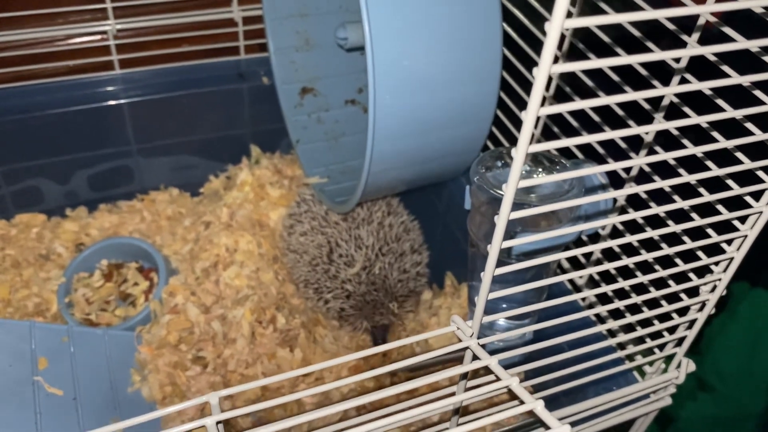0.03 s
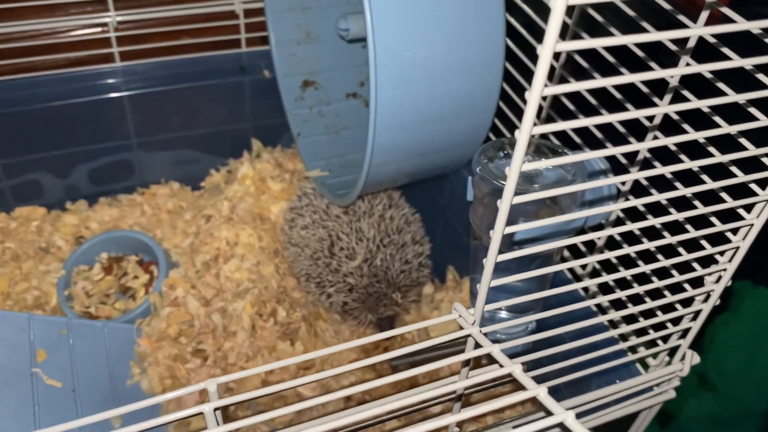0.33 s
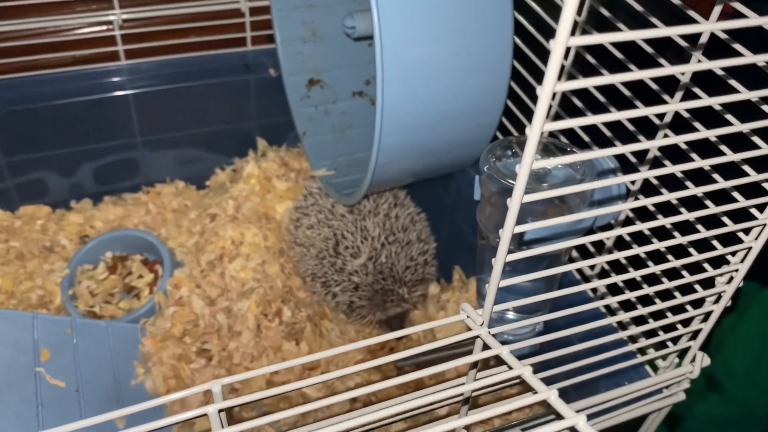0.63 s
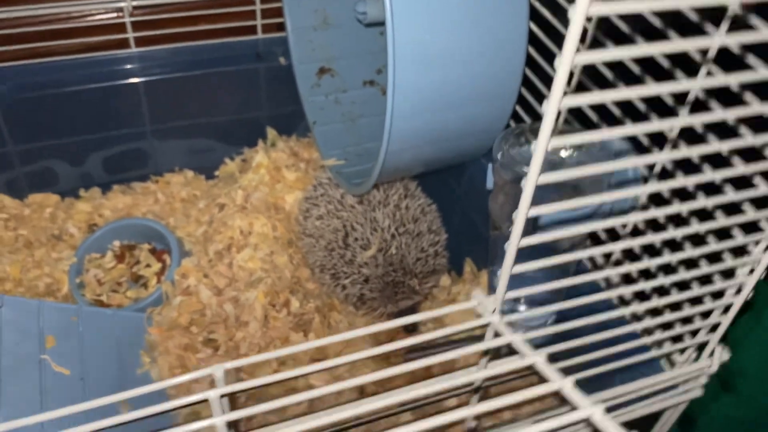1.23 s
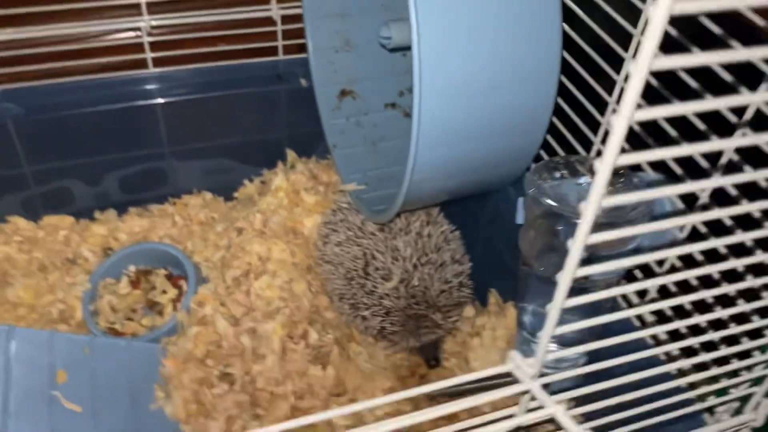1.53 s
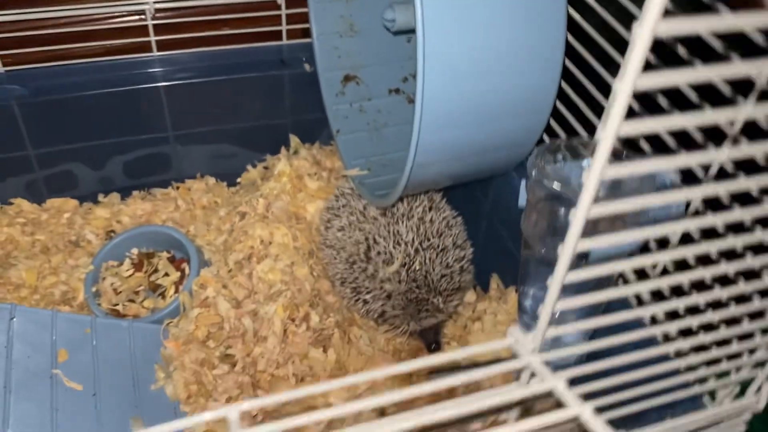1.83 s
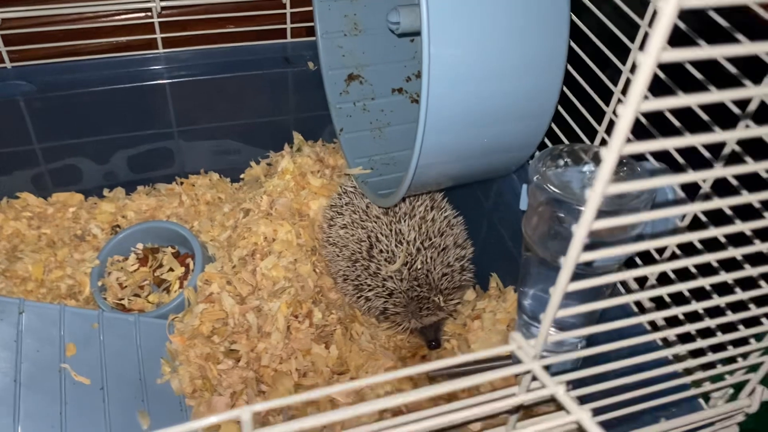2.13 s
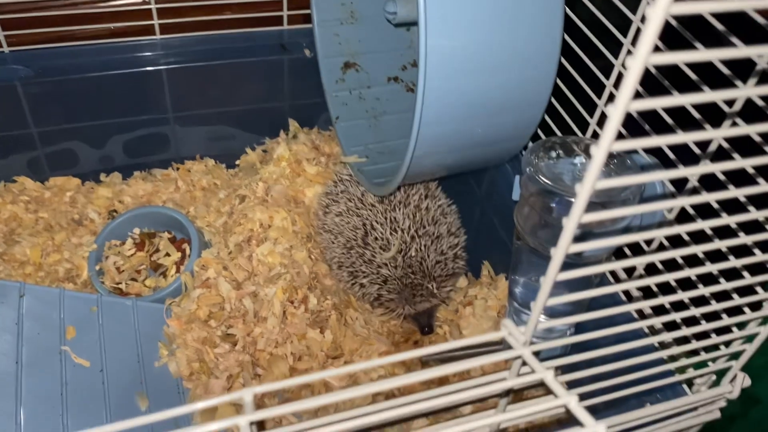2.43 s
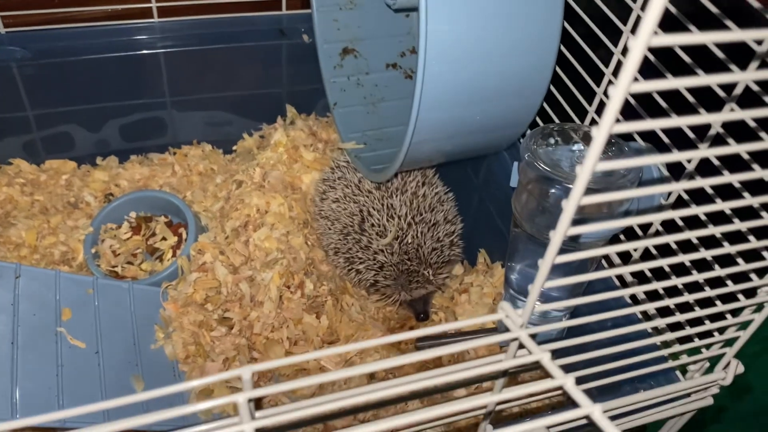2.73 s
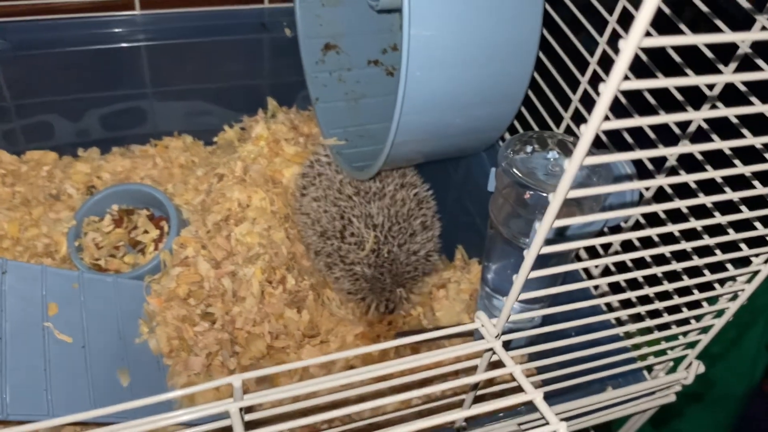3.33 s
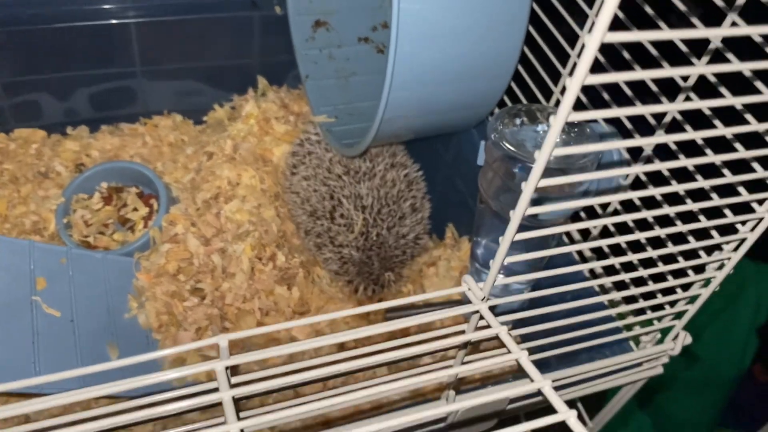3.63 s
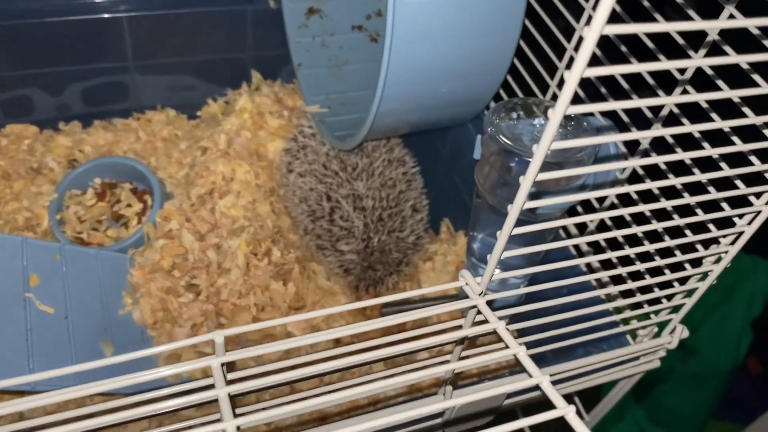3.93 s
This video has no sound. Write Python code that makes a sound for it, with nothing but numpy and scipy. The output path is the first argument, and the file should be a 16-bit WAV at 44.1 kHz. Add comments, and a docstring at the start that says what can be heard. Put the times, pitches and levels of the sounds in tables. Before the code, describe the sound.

Wood shavings rustle and snap as a hedgehog sniffs faintly and digs close to the microphone, softly bumping its plastic tub. Near the end, one loud knock sets the wire cage rattling. A small room hums low underneath.

```python
"""Quick little sniffs sound over the mains hum and low rumble of a small room. A hedgehog, close to the
microphone, is puffing air through its nose and digging in wood shavings in a wire cage with a plastic tub.
The chips rustle and snap, its spines scrape the wall, and the tub is bumped softly.
Near the end, one loud knock sets the tub booming and the wires ringing and rattling."""
import sys
import numpy as np
from scipy import signal
from scipy.fft import rfft, irfft, next_fast_len
from scipy.io import wavfile
from scipy.ndimage import uniform_filter1d

SR = 44100
rng = np.random.default_rng(int(sys.argv[2]) if len(sys.argv) > 2 else 0)


def wrap_up_sound(samples):
    """Save the sound to the file named by the first command line argument, as 16-bit audio."""
    columns = np.atleast_2d(samples).T
    # keep every value between -1 and 1, then stretch to whole-number steps
    tamed = np.clip(columns, -1, 1)
    steps = np.round(tamed * 32767).astype(np.int16)
    wavfile.write(sys.argv[1], SR, steps)


N = 176400
T = np.arange(N) / SR

# Echo of cage and room; a fade time is how long a sound takes to drop 60 dB (frequency [Hz], fade time [s])
ROOM_FADE = [(500, 0.27), (2000, 0.2), (14000, 0.075)]
# How alike the two microphones hear sound that comes from all sides (frequency [Hz], likeness [0-1])
MIC_LIKENESS = [(60, .95), (300, 0.45), (600, 0.11), (2500, 0.046), (6500, 0.19), (8500, 1)]
# How far the left microphone runs ahead of the right (frequency [Hz], phase lead [radians])
MIC_LEAD = [(900, 0), (2200, 1.1), (3000, -.7), (6500, .3), (7500, 1.6), (9250, 3.14), (11500, 5.6),
            (13300, 6.7), (15500, 9.4)]

# Tones of the mains hum (frequency [Hz], level [dB])
HUM_TONES = [(60, -71), (120, -61), (180, -55.5), (300.4, -59), (360, -77)]
# Rumble and hiss of the room (frequency [Hz], relative level [dB])
RUMBLE_SPECTRUM = [(20, -25), (55, 1.5), (88, 4.5), (200, -8.5), (320, -20), (1200, -34), (3000, -36.5),
                   (6000, -43.5), (15000, -52)]

# How loudly the shavings are stirred (time [s], level [dB])
STIR_LEVELS = [(0, -81.5), (.6, -78.5), (.7, -67.5), (.88, -63), (1.18, -64), (1.56, -66), (2.1, -67.5),
               (2.5, -73.5), (2.88, -66.5), (2.99, -56.5), (3.24, -54.5), (3.35, -60), (3.72, -64)]
# Tone colour of stirred shavings (frequency [Hz], relative level [dB])
STIR_SPECTRUM = [(150, 6), (450, 5.5), (1000, -0.5), (2400, -0.5), (3300, -4.5), (4200, -3.5), (6000, -7),
                 (9000, -13), (15000, -13)]
# Spines scraping the tub wall (time [s], resonance [Hz], level [dB])
SCRAPE_PATH = [(2.94, 4100, -74), (3.02, 4160, -57), (3.33, 4080, -62.5), (3.38, 3590, -68),
               (3.75, 3770, -75)]
# How loudly the shavings slide after the knock (time [s], level [dB])
SLIDE_LEVELS = [(3.82, -56), (3.86, -48), (3.9, -53.5), (3.92, -67), (4, -62.5)]
# Hiss of sliding shavings (frequency [Hz], relative level [dB])
SLIDE_SPECTRUM = [(1500, -9), (4000, 4), (7000, 0.5), (14500, -4)]
# Shoves through the shavings (start [s], length [s], level [dB])
SHOVES = [(0.112, 0.056, -65), (.635, 0.038, -59), (.885, .16, -55), (1.047, .11, -53),
          (1.626, 0.062, -58.5), (1.752, 0.074, -51), (2.428, 0.058, -66.5), (3.155, 0.047, -50.5)]
# Swish of a shove (frequency [Hz], relative level [dB])
SWISH_SPECTRUM = [(500, 4), (2400, -0.5), (3500, -4), (15000, -19)]
# Chips breaking (time [s], level [dB], woody body relative to the tick [dB], top treble gain [dB])
CHIP_SNAPS = [(.225, -63.5, 14, -12), (.646, -52, 2.5, -11), (1.232, -26, -10, -3),
              (1.3565, -40.5, -14, -7), (1.460, -35, -12, -6.5), (1.507, -42, -9, -8), (2.243, -45, 4, -5),
              (2.347, -34.5, -16, -2), (2.813, -47, 5, -8), (2.883, -47, 2, -2), (2.9454, -35.5, -3, -4),
              (2.9597, -29, -9, 7), (2.9831, -37.5, 1, -6), (3.0125, -35.5, 1, -7), (3.060, -33, -4, -10),
              (3.0694, -29, -2.5, -8), (3.1138, -28, -3.5, -6), (3.201, -29, -2.5, -4),
              (3.211, -26.5, -5.5, -2), (3.2296, -21, -4, 1.5), (3.296, -32.5, -4, 9),
              (3.4047, -30, -13, -3), (3.449, -32.5, -2, -13)]
# Bright tick of a chip or a spine (frequency [Hz], relative level [dB])
TICK_SPECTRUM = [(1500, -21), (3500, 4), (5000, 6), (12500, 0), (16000, -4.5)]
# Woody body of a snap (frequency [Hz], relative level [dB])
WOOD_SPECTRUM = [(700, 2), (3000, 0), (9000, -19.5)]

# Puffs through the nose (start [s], level [dB], nose resonance [Hz])
NOSE_PUFFS = [(.054, -66, 1400), (.088, -65.5, 2380), (0.123, -59, 2650), (0.152, -63.5, 2030),
              (0.211, -63, 2500), (0.239, -66, 2750), (.305, -65.5, 3170), (.342, -60.5, 2640),
              (.426, -63, 2610), (.5, -69.5, 2840), (.563, -65.5, 2310), (2.582, -68, 2770),
              (2.655, -69, 3500), (2.862, -61, 3460)]
# Faint nose whistles (start [s], length [s], level [dB], pitch [Hz], glide [share of the pitch])
NOSE_WHISTLES = [(1.944, 0.062, -64.5, 2820, -0.082), (2.16, 0.093, -67, 2550, .08)]

# Soft bumps on the tub (time [s], level [dB], pitch [Hz], length [s], sag [share of the pitch])
TUB_BUMPS = [(0.288, -53, 710, 0.0051, 0.06), (0.838, -39.5, 424, 0.0052, 0.17),
             (0.892, -31.5, 440, 0.0084, 0.11), (0.903, -35.5, 400, 0.0094, 0.01),
             (1.383, -33.5, 471, 0.009, 0.11), (1.391, -38, 450, 0.016, 0.09),
             (1.804, -27, 149, 0.026, 0.38), (2.124, -53, 720, .007, .1), (2.818, -51.5, 763, .006, 0),
             (3.486, -43.5, 390, 0.014, 0.17), (3.4928, -25.5, 126.5, 0.019, 0.3),
             (3.587, -34.5, 347, 0.011, 0.09), (3.589, -31, 105, 0.025, 0.33)]
# Hollow tap at the start of a bump (frequency [Hz], relative level [dB])
TAP_SPECTRUM = [(100, -11), (700, 1.5), (1200, -14), (6000, -42)]
# Hard crack that starts the knock (frequency [Hz], relative level [dB])
CRACK_SPECTRUM = [(300, -12), (1000, -10.5), (3000, -12.5), (4400, -1.5), (5600, -12), (7100, 6.5),
                  (8600, 0.5), (9500, -2), (11000, -0.5), (13500, -9.5), (15200, -8), (16000, -22)]
# Tones at which the tub rings (frequency [Hz], level [dB], fade time [s], rise time [s])
TUB_TONES = [(136.4, -21, .46, .092), (211.2, -12.5, 0.19, 0.023), (277.8, -12, 0.2, 0.036),
             (332, -7.5, .11, .00091), (397.7, -17, .17, 0.0028), (1037, -18.5, 0.084, .00083),
             (1148.5, -27, .2, 0.0049)]
# Tones at which the wires ring (frequency [Hz], level [dB], fade time [s])
WIRE_TONES = [(455, -33.5, 0.56), (524, -32.5, 1.06), (670, -39.5, .9), (774, -42, 1.3), (838, -34, 0.63),
              (870, -39, 0.98), (974, -41, 1.3), (1060, -35, 1.07), (1144, -45, .7), (1533, -33, .25),
              (1695, -36, 0.65), (2266, -39, 0.4), (2770, -41, 0.34), (3360, -41, 0.26), (6515, -43.5, .45)]
# Rattle of the cage (frequency [Hz], relative level [dB])
RATTLE_SPECTRUM = [(25, -48), (110, -1.5), (350, -6), (1100, -6.5), (1600, -10.5), (3100, -15),
                   (4500, -11.5), (7000, -19.5), (15500, -27)]
# How the rattle dies away (frequency [Hz], fade time [s])
RATTLE_FADE = [(1000, 0.63), (2200, 0.43), (5000, .22), (12000, 0.23)]


def amp(db):
    """Turns decibels into a number to multiply a sound by."""
    return 10 ** (np.asarray(db) / 20)


def unit(x):
    """Scales a sound so that its average level (rms) is 1."""
    return x / np.sqrt(np.mean(x ** 2) + 1e-20)


def look_up(table, hz):
    """Reads between the rows of a table on a logarithmic frequency scale."""
    freqs, values = np.transpose(table)
    return np.interp(np.log(hz + 1), np.log(freqs + 1), values)


def add(mix, start_s, sound):
    """Adds a sound to the mix at the given time."""
    part = mix[..., round(start_s * SR):][..., :sound.shape[-1]]
    part += sound[..., :part.shape[-1]]


def colour(x, spectrum, size=8192):
    """Gives a sound the tone colour of a spectrum; white noise keeps its overall level."""
    log_gain = np.log(amp(look_up(spectrum, abs(np.fft.fftfreq(size, 1 / SR)))))
    response = np.exp(np.conj(signal.hilbert(log_gain)))  # rings only after a click, never before
    taps = np.fft.ifft(response).real[:size // 2]
    return np.apply_along_axis(signal.oaconvolve, -1, x, taps / np.linalg.norm(taps))[..., :x.shape[-1]]


def resonate(x, hz, width_hz):
    """Keeps one band of a sound, around a pitch that may move."""
    turn = np.exp(2j * np.pi * np.cumsum(hz) / SR)
    decay = np.exp(-np.pi * width_hz / SR)
    return unit((turn * signal.lfilter([1], [1, -2 * decay, decay * decay], x / turn)).real)


def patchy(x, patch_db, flicker_db):
    """Keeps a sound changing: short random patches of colour, and a flicker shared by all bands."""
    bands = signal.stft(x, nperseg=512, noverlap=384)[2]
    patches = uniform_filter1d(rng.standard_normal(bands.shape), size=8, axis=1)
    patches = uniform_filter1d(patches, size=3, axis=0)
    flicker = uniform_filter1d(rng.standard_normal(bands.shape[1]), size=9)
    gain = amp(patch_db * unit(patches) + flicker_db * unit(flicker))
    return unit(signal.istft(bands * gain, nperseg=512, noverlap=384)[1][:N])


def surrounding_noise(count):
    """Noise from all sides, as the two microphones hear it."""
    left, other = rfft(rng.standard_normal((2, count)))
    likeness = np.clip(look_up(MIC_LIKENESS, np.fft.rfftfreq(count, 1 / SR)), -1, 1)
    right = likeness * left + np.sqrt(1 - likeness ** 2) * other
    return irfft(np.array([left, right]), count)


def fading_noise(fade_times):
    """Noise from all sides in which each band dies away at its own speed."""
    hz, t, bands = signal.stft(surrounding_noise(SR // 2), SR, nperseg=256)
    fade = amp(-60 * t / look_up(fade_times, hz)[:, None])
    return signal.istft(bands * fade, SR, nperseg=256)[1]


def room(x, echo_db):
    """The direct sound plus the short echo of cage and room, in stereo."""
    tail = fading_noise(ROOM_FADE)
    echo = signal.fftconvolve(x[None], tail / np.linalg.norm(tail[0]), axes=1)[:, :N]
    return x + amp(echo_db) * echo


def crackle(clicks_per_s=3500, spread_db=4):
    """A dense stream of tiny clicks of very uneven size."""
    sizes = amp(spread_db * np.minimum(rng.exponential(1, N), 5))
    return unit(sizes * rng.choice([-1, 1], N) * (rng.random(N) < clicks_per_s / SR))


def background(rumble_db=-53.5):
    """Steady mains hum over the room's low rumble and faint hiss."""
    hum = sum(amp(db) * np.sqrt(2) * np.sin(2 * np.pi * (hz * T + rng.random())) for hz, db in HUM_TONES)
    return hum + amp(rumble_db) * colour(surrounding_noise(N), RUMBLE_SPECTRUM)


def stirred_shavings():
    """Chips shift under the animal, and their many small clicks blur into a rustle."""
    loudness = amp(np.interp(T, *np.transpose(STIR_LEVELS)))
    return colour(loudness * patchy(crackle(), patch_db=4, flicker_db=1), STIR_SPECTRUM)


def scraping_spines(width_hz=260, brush_db=-1.5):
    """Spines drag along the tub wall: a narrow scraping note inside a bright brushing sound."""
    times, hz, db = np.transpose(SCRAPE_PATH)
    scrape = resonate(crackle(), np.interp(T, times, hz), width_hz)
    brush = amp(brush_db) * colour(crackle(), TICK_SPECTRUM)
    return (scrape + brush) * amp(np.interp(T, times, db, left=-np.inf, right=-np.inf))


def sliding_shavings():
    """Shavings slide with a grainy hiss after the knock."""
    loudness = amp(np.interp(T, *np.transpose(SLIDE_LEVELS), left=-np.inf))
    return colour(loudness * crackle(), SLIDE_SPECTRUM)


def swishes(skew=0.78):
    """Each shove through the shavings makes a crackle that swells and fades."""
    effort = np.zeros(N)
    for start, length, db in SHOVES:
        progress = np.arange(0, 1, 1 / (length * SR))
        add(effort, start, amp(db) * np.sin(np.pi * progress ** skew))
    return colour(effort * crackle(), SWISH_SPECTRUM)


def snapping_chips(tick_fade_s=0.016, body_fade_s=0.045, treble_hz=9000):
    """Each breaking chip gives a tick, crisp or dull, and a short woody burst."""
    ticks, bodies, t = np.zeros(N), np.zeros(N), T[:SR // 10]
    for start, db, body_db, treble_db in CHIP_SNAPS:
        tick, body = rng.standard_normal((2, len(t))) * amp(db - 9)  # leaves 9 dB for the noise's peaks
        treble = signal.filtfilt(*signal.butter(2, treble_hz, "high", fs=SR), tick)
        tick = tick - treble + amp(treble_db) * treble
        add(ticks, start, tick * amp(-60 * t / tick_fade_s))
        add(bodies, start, body * amp(body_db - 60 * t / body_fade_s))
    return colour(ticks, TICK_SPECTRUM) + colour(bodies, WOOD_SPECTRUM)


def sniffs(length_s=0.029, glide=0.15, nose_width_hz=320, rasp_width_hz=2200):
    """Quick puffs of air through the nose: a narrow, rising resonance inside a wide rasp."""
    out, progress = np.zeros(N), np.arange(0, 1, 1 / (length_s * SR))
    swell = np.sin(np.pi * progress ** 0.51)
    for start, db, hz in NOSE_PUFFS:
        pitch = hz * (1 + glide * (progress - 0.5))
        nose, rasp = rng.standard_normal((2, SR))[:, :len(progress)]
        air = resonate(nose, pitch, nose_width_hz) + 0.5 * resonate(rasp, pitch, rasp_width_hz)
        add(out, start, amp(db) * swell * unit(air))
    return out


def nose_whistles(width_hz=90):
    """Two longer breaths ring in the nose as thin, gliding whistles."""
    out = np.zeros(N)
    for start, length, db, hz, glide in NOSE_WHISTLES:
        progress = np.arange(0, 1, 1 / (length * SR))
        pitch = hz * (1 + glide * (progress - 0.5))
        tone = resonate(rng.standard_normal(SR)[:len(progress)], pitch, width_hz)
        add(out, start, amp(db) * np.sin(np.pi * np.sqrt(progress)) * tone)
    return out


def tub_bumps(grit_gain=0.18, tap_db=-16, tap_fade_s=0.071):
    """The bumped tub gives dull, short thuds that sag in pitch; higher ones start with a hollow tap."""
    thuds, taps, t = np.zeros(N), np.zeros(N), T[:SR // 5]
    for start, db, hz, length, sag in TUB_BUMPS:
        pitch = hz * (1 - sag * np.minimum(t / length, 1))
        tone = -np.sin(2 * np.pi * np.cumsum(pitch) / SR)
        grit = grit_gain * resonate(rng.standard_normal(len(t)), pitch, width_hz=1.25 * hz)
        age = t / (0.28 * length)  # the thud is loudest at age 1
        add(thuds, start, amp(db) * age * np.exp(1 - age) * (tone + grit))
        tap_loudness = (hz / 400) ** 2 * amp(db + tap_db - 60 * t / tap_fade_s)
        add(taps, start, tap_loudness * rng.standard_normal(len(t)))
    return room(thuds, echo_db=-12.5) + room(colour(taps, TAP_SPECTRUM), echo_db=-1.5)


def hard_crack(start_s, level_db=-15.5, hold_s=0.0032, fade_s=0.018):
    """The hit itself: a bright burst of noise that holds for an instant, then dies fast."""
    out, t = np.zeros(N), T[:SR // 2]
    loudness = amp(level_db - 60 * np.maximum(t - hold_s, 0) / fade_s)
    add(out, start_s, loudness * rng.standard_normal(len(t)))
    return colour(out, CRACK_SPECTRUM)


def ringing_wires(start_s, phase_spread=0.93, waver_share=0.49, waver_width_hz=30):
    """The shaken wires ring unevenly, each tone a little out of step between left and right."""
    out, t = np.zeros((2, N)), T[:SR // 2]
    for hz, db, fade_s in WIRE_TONES:
        phase = 2 * np.pi * rng.random() + phase_spread * rng.uniform(-1.2, 1, (2, 1))
        steady = np.sin(2 * np.pi * hz * t + phase)
        wavering = resonate(rng.standard_normal(len(t)), np.full(len(t), hz), waver_width_hz)
        ring = (1 - waver_share) * steady + waver_share * wavering
        add(out, start_s, amp(db - 60 * t / fade_s) * ring)
    return out


def cage_rattle(start_s, level_db=-21.5):
    """The shaken cage rattles: a wash of noise whose treble dies first."""
    out = np.zeros((2, N))
    add(out, start_s, amp(level_db) * colour(fading_noise(RATTLE_FADE), RATTLE_SPECTRUM))
    return out


def tub_boom(start_s, push_db=-5.5, push_s=0.00073, push_lag_s=0.0019, low_cut_hz=65):
    """The tub gives way with one push, then booms: the struck wall answers at once, the rest builds up."""
    out, t = np.zeros(N), T[:SR // 2]
    ring = sum(amp(db - 60 * t / fade_s) * (1 - np.exp(-t / rise_s)) * np.sin(2 * np.pi * hz * t)
               for hz, db, fade_s, rise_s in TUB_TONES)
    swing = (t - push_lag_s) / push_s
    push = amp(push_db) * swing * np.exp(-swing ** 2 / 2)
    add(out, start_s, push - ring)
    return signal.sosfilt(signal.butter(2, low_cut_hz, "high", fs=SR, output="sos"), out)


def knock(crack_s=3.7476, rattle_s=3.7515, boom_s=3.7556):
    """One loud knock: a hard crack, then the cage rattles, the tub booms and the wires ring."""
    crack = hard_crack(crack_s)
    cage = ringing_wires(boom_s) + cage_rattle(rattle_s)
    return room(crack, echo_db=-13.5) + room(tub_boom(boom_s), echo_db=-14.5) + cage


def scene():
    """All the sounds together, from the background to the knock."""
    mix = background()
    mix += room(stirred_shavings() + scraping_spines() + sliding_shavings(), echo_db=2)
    mix += room(swishes(), echo_db=-3.5)
    mix += room(snapping_chips(), echo_db=-8)
    mix += room(sniffs() + nose_whistles(), echo_db=-0.5)
    return mix + tub_bumps() + knock()


def record(dry, top_hz=16100):
    """The two microphones hear the treble slightly out of step, and the very highest sounds are cut."""
    size = next_fast_len(N + SR // 10)
    lead = look_up(MIC_LEAD, np.fft.rfftfreq(size, 1 / SR))
    phase_shift = np.exp(0.5j * np.array([lead, -lead]))
    pair = irfft(rfft(dry, size) * phase_shift, size)[:, :N]
    low_pass = signal.firwin(255, top_hz, window=("kaiser", 9), fs=SR)
    return signal.oaconvolve(pair, low_pass[None], "same")


dry = scene()
out = record(dry)
wrap_up_sound(out)
```